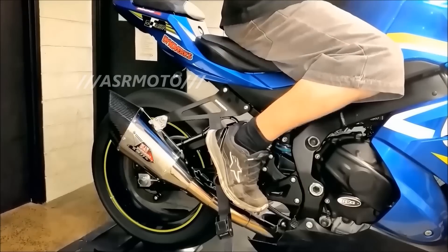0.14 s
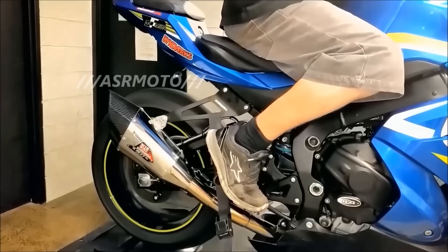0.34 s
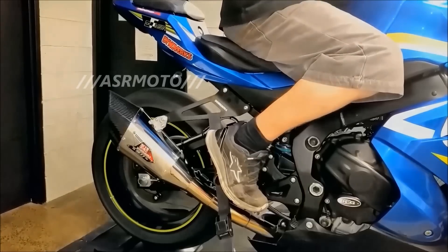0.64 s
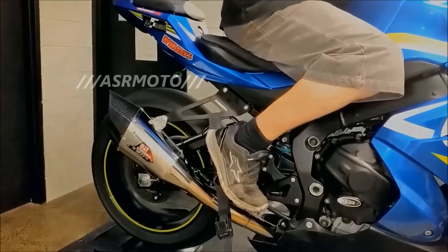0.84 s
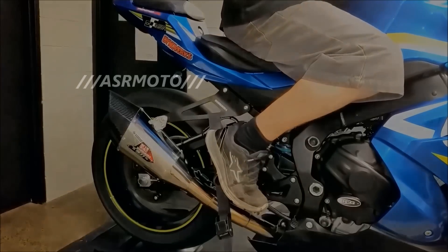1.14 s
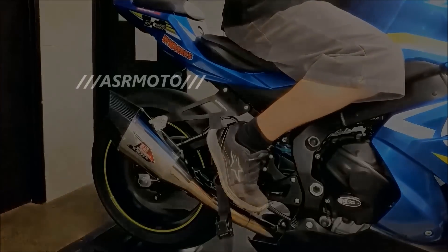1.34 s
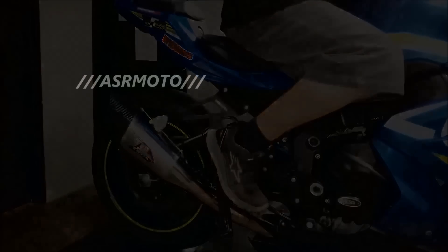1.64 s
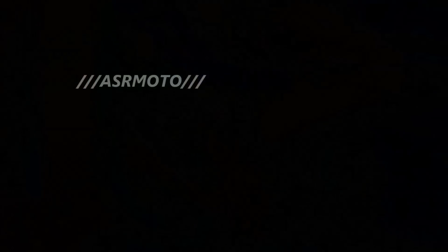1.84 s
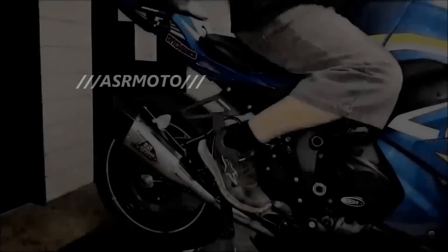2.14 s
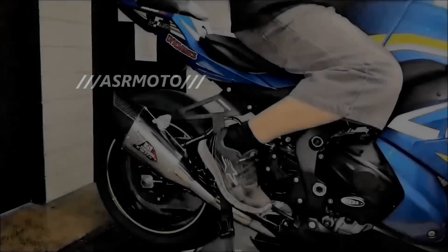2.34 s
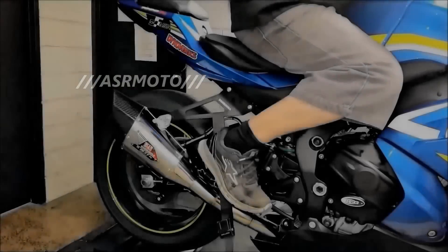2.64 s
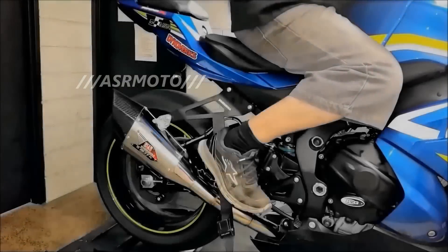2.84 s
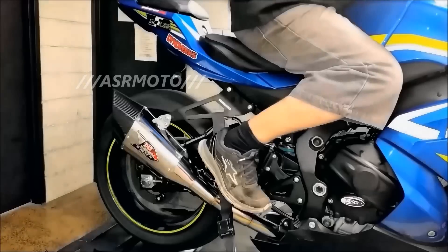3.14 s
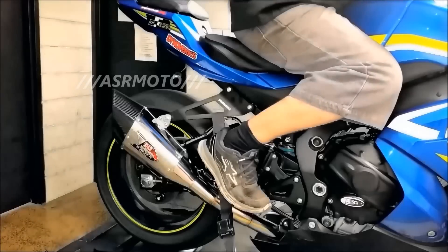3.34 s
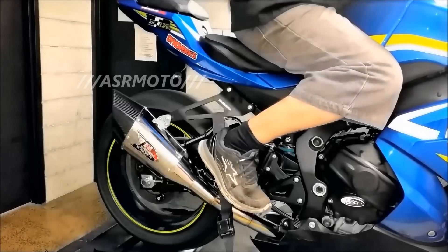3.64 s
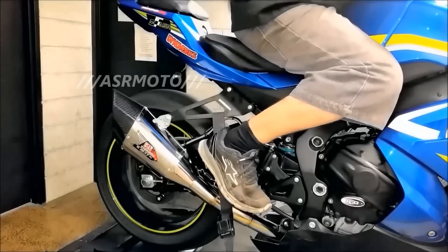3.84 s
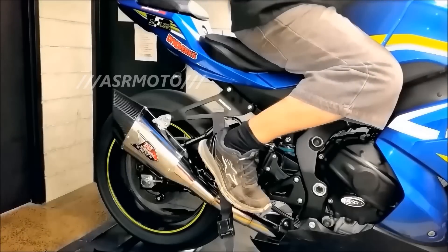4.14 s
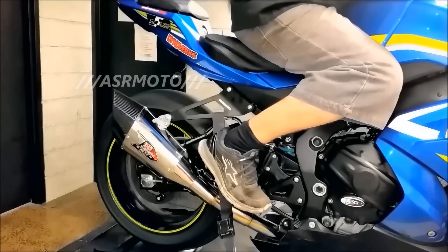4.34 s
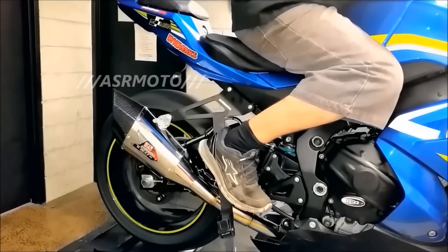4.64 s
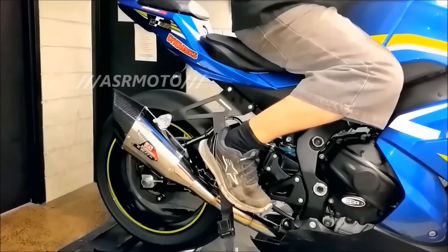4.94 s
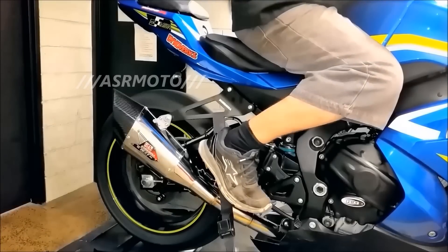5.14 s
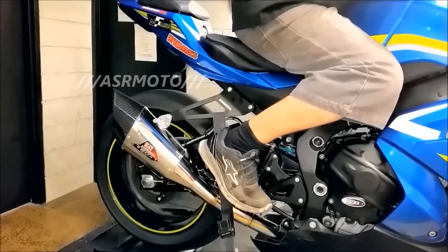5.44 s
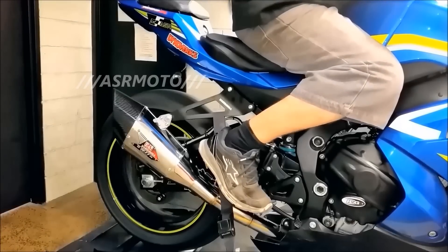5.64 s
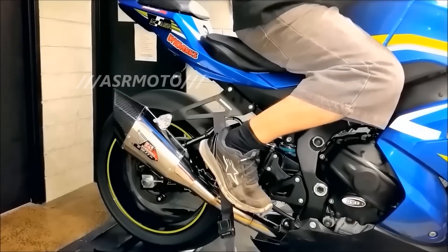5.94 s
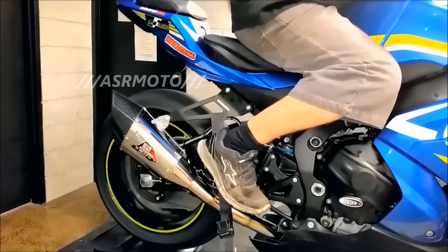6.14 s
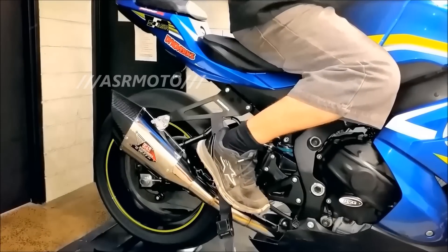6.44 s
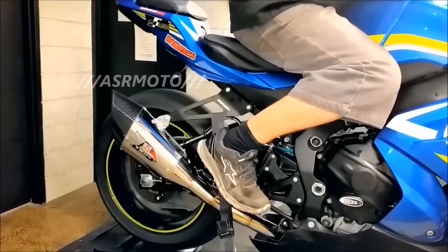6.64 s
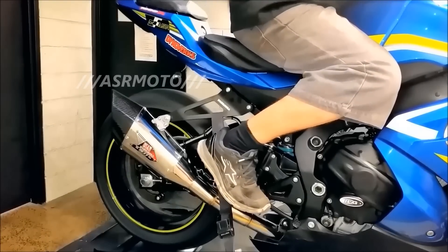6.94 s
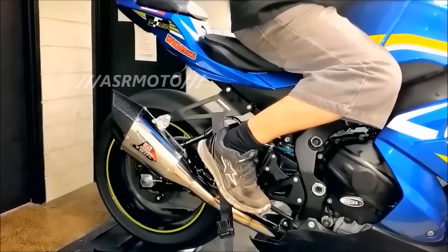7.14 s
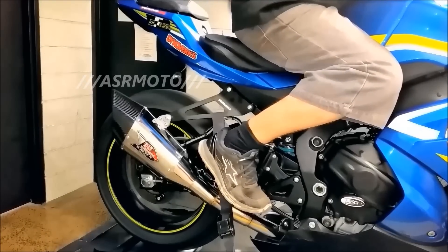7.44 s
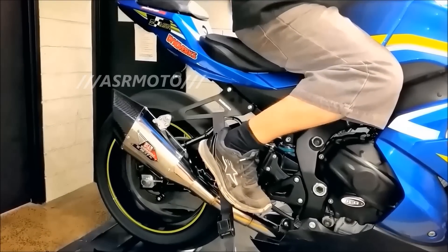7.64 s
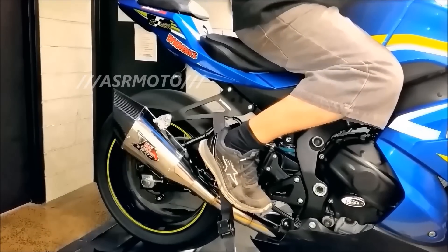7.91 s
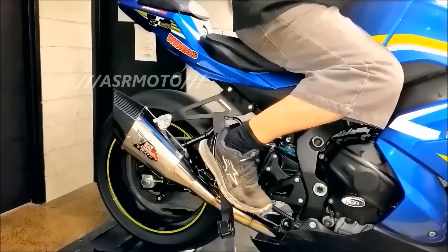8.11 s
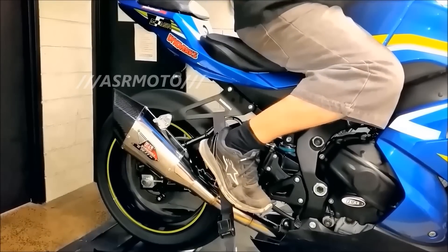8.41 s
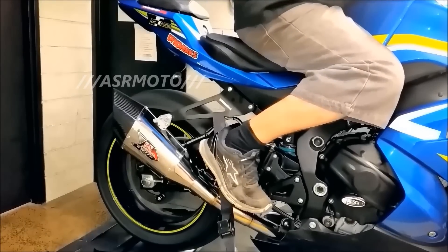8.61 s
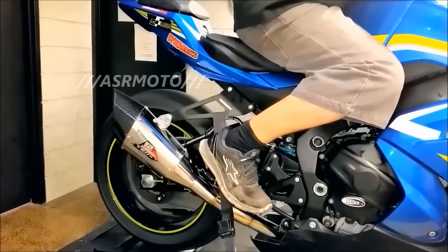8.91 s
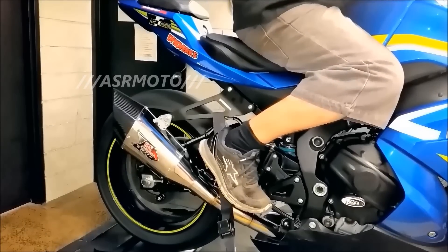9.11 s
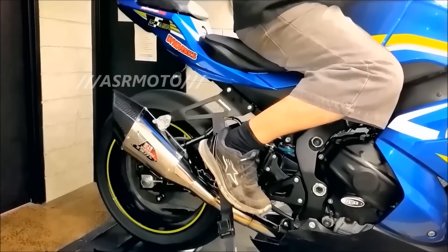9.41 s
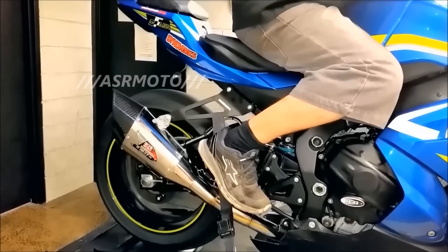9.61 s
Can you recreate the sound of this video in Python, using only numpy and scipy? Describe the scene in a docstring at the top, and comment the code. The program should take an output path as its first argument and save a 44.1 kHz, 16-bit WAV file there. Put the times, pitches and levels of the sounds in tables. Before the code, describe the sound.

A four-cylinder engine heard beside its exhaust in a boomy, reflective room. A short blip and softer coast fade out near two seconds; a deep, pulsing idle fades in and swells into a steady roar. The tone climbs smoothly, stumbles through a rough gear change with a throttle blip, climbs again, then snaps down at a quick shift. Throbbing mechanical clatter, fan drone and hiss sit underneath; the close stereo microphone compresses loud booms.

```python
"""A four-cylinder motorcycle on a roller test bench, close to a two-port microphone in a small hard-walled workshop.
It blips and coasts, fades out and in, then pulls through two gear shifts. The exhaust is a comb of firing tones
over a rumble of uneven firings, and sweeps through the standing waves of the room. Clatter is noise that throbs
with the firings, and gear whine is wavering tones. Shaped noise makes the cooling fan's drone, and a low thud
with airy hiss. Automatic gain ducks the hiss under each boom."""
import sys
import numpy as np
from scipy import signal
from scipy.fft import rfft, irfft, next_fast_len
from scipy.io import wavfile
from scipy.ndimage import uniform_filter1d, map_coordinates

SR = 44100
rng = np.random.default_rng(int(sys.argv[2]) if len(sys.argv) > 2 else 0)


def output_pcm(signal):
    """Save a mono or channel-first signal as 16-bit PCM at the path in sys.argv[1].

    Samples are clipped to [-1, 1] before scaling.
    """
    pcm = np.clip(np.atleast_2d(signal).T, -1, 1) * 32767
    wavfile.write(sys.argv[1], SR, np.round(pcm).astype(np.int16))


N = 430857

# All levels are relative: later stages and the automatic gain shift them.
# Engine speed through blip, hold, coast, idle, first pull, clutch and blip, second pull, quick shift:
# start_s [s], firing_rate_hz [firings per second]
ENGINE_SPEED = [(0, 103.7), (.3, 92.8), (.5, 98.55), (.74, 119.7), (.84, 143.2), (1.44, 139.2),
                (1.51, 131.5), (1.68, 92), (1.95, 75), (1.97, 54.6), (2.3, 54.3), (2.55, 57.5),
                (2.98, 53.9), (4.0, 82.3), (4.62, 102), (4.8, 110.2), (6.25, 165), (6.29, 170.2),
                (6.4, 144.1), (6.58, 120.3), (6.77, 135.3), (6.89, 128.2), (7.3, 132.1), (7.6, 137.9),
                (8.3, 156.9), (9.0, 177.5), (9.475, 189.8), (9.54, 157.1), (9.77, 163.4)]
# Throttle: start_s [s], even_firing_db [dB], pulse_softness_db [dB per order], uneven_firing_db [dB]
THROTTLE = [(0, -44, 7, -46.5), (.12, -50, 7, -47), (.6, -56, 7, -52.5), (.8, -54, 2.5, -54.5),
            (.84, -48, 8.5, -70), (1.1, -50.5, 13, -63), (1.5, -50, 6, -59), (1.95, -53, 2.5, -47),
            (2, -56.5, -0.5, -82), (2.5, -54.5, 0, -67.5), (2.85, -57, -1.5, -71), (3.4, -46.5, 1.5, -55.5),
            (4, -42.5, 1, -53), (4.9, -37, 1, -49), (6.2, -38.5, 0.5, -49.5), (6.4, -46, 8, -41),
            (6.55, -44.5, 2.5, -46), (6.88, -39.5, 1, -46.5), (7.4, -37, 1, -50.5), (8, -37.5, 0, -47),
            (9.3, -37, 2.5, -56), (9.6, -40, 1.5, -40), (9.77, -36.5, 1.5, -52)]
# Ragged firing around the shifts: centre_s [s], half_length_s [s, to 1/e], even_firing_loss_db [dB]
SHIFT_CUTS = [(6.235, 0.015, 6), (6.708, 0.085, 5), (9.511, 0.03, 13)]
CUT_SHARPENS, CUT_BANGS = 0.46, 0.66  # softness lost and unevenness gained per dB of loss
# Exhaust tones, the half orders from unlike cylinders: order [multiple of the firing rate], level_db [dB]
EXHAUST_ORDERS = [(.5, -25), (1, 2), (1.5, -10), (2, 0), (2.5, -13), (3, -2.5), (3.5, -14), (4, -6.5),
                  (4.5, -16), (5, -10.5), (5.5, -37), (6, -15.5), (6.5, -29.5), (7, -25), (8, -32)]
# Exhaust pipe colour: pitch_hz [Hz], level_db [dB]
PIPE_COLOUR = [(30, -3.5), (60, 23), (100, 24.5), (150, 21.5), (250, 17.5), (400, 20), (640, 19.5),
               (1000, 6), (2000, -8)]
# Resonances of room and silencer, peaks and nulls: pitch_hz [Hz], width_hz [Hz], level_db [dB]
ROOM_AND_SILENCER = [(57.9, 2.2, 5), (653, 13, 8), (694, 31, 6.5), (745, 34, 5.5), (807, 12.6, 9),
                     (835, 43, -20), (891, 28, 5), (938, 33, 3.5), (1005, 8.8, 10.5), (1056, 11.4, 10.5),
                     (1172, 16, 8.5), (1321, 15, 7), (1655, 11, 8)]
# Standing waves, peaks and nulls at the microphone: pitch_hz [Hz], width_hz [Hz], level_db [dB]
ROOM_MODES = [(69.6, 11.7, -32), (89.4, 5.5, -4.5), (99.2, 5.4, 3), (125.34, 8.4, -30), (140.3, 3.96, 7.5),
              (155.1, 14, 12), (156.75, 9.6, -14), (168.2, 6.1, -43), (180, 11.2, 15), (187.6, 44, -39),
              (202.7, 5.3, 8), (222.3, 11.5, 11.5), (227.5, 8.7, -19), (265, 2.4, -28.5), (307, 2.3, -2),
              (307.4, 3.2, 11.5), (314.4, 15.6, -16), (331.3, 4.9, 13.5), (343.3, 45.4, -34.5),
              (351, 8, 16), (387.6, 6.2, -12), (401.6, 11.7, 16), (404.8, 13.2, -32), (434.2, 13.5, 7.5),
              (492.3, 8.6, 17), (501.4, 39.6, -10), (544.7, 10.4, 13), (553.7, 28, -12.5), (580, 5.7, -9),
              (626.5, 60, -37)]
# Valve gear, chain and air: pitch_hz [Hz], level_db [dB per Hz]
CLATTER_COLOUR = [(350, -4), (600, -4), (688, -16.5), (844, -6), (1010, -11.5), (1480, -11), (1630, -11.5),
                  (1890, -12), (2140, -13), (7210, -25.5), (10100, -21.5), (11900, -19), (15700, -25.5)]
CLATTER_EVEN_DB, CLATTER_UNEVEN_DB = -4.5, 1  # clatter re even and re uneven firing
CLATTER_OCTAVE_DB, CLATTER_IDLE_DB = 5.5, -57  # rise per octave of speed; least level
# Gear tooth whine: order [multiple of the firing rate], level_db [dB]
GEAR_TEETH = [(22.5, -24), (23.05, -6.5), (24.05, -20)]
# Gear casing resonances: pitch_hz [Hz], width_hz [Hz], level_db [dB]
GEAR_CASING = [(4230, 340, 14), (3670, 150, -3), (2930, 210, 4), (2100, 200, 5.5)]
# Cooling fan drone: pitch_hz [Hz], half_width_hz [Hz, to half amplitude], level_db [dB]
FAN_DRONE = [(294, 15, -35)]
# Low thud and hiss of air: pitch_hz [Hz], level_db [dB per Hz]
THUD_AND_HISS = [(25, 12), (45, 7), (58, 35.5), (75, 19), (300, -19), (1000, -14), (3000, -1.5), (5500, 3),
                 (7500, -7), (10000, 5.5), (15700, -7)]
# Level of the low thud and hiss: start_s [s], level_db [dB]
THUD_AND_HISS_LEVEL = [(0, -34.5), (.8, -37.5), (.86, -47), (5.9, -55), (6.4, -36), (7.1, -35), (7.6, -49),
                       (9.77, -53)]
# Likeness of the ports for equal mid and side: pitch_hz [Hz], likeness [correlation, -1 to 1]
PORT_LIKENESS = [(60, 0.78), (130, 0.77), (290, 0.57), (640, 0.34), (1400, 0.062), (3000, -0.12),
                 (7000, -0.18), (15000, -0.076)]
# Lean of the microphone ports: pitch_hz [Hz], left_minus_right_db [dB]
PORT_LEAN = [(60, 3.0), (110, 2.5), (200, 3.5), (380, 2.5), (700, 2.5), (1290, 2.5), (2380, 1.0),
             (4400, -2.0), (8120, 1.5), (15000, 2.0)]
# Fade out and in: start_s [s], gain [factor]
FADE_GAIN = [(0, 1), (.9, 1), (1.925, 0), (2.012, 0), (3, 1), (9.77, 1)]
TOP_HZ = 15780  # upper limit of the microphone channel


def exhaust():
    """Even firings give a comb of tones; the scatter from firing to firing gives a rumble between them."""
    hz, count = firings()
    _, even_db, soft_db, uneven_db = throttle()
    # ragged firing makes the tones waver
    shaky = np.clip(amp(.5 * (uneven_db - even_db + 12.5)), .2, 2.5)
    tones = 0
    for order, level_db in EXHAUST_ORDERS:
        odd = order % 1
        # soft pulses lose overtones and sound alike
        dulled_db = soft_db * (abs(order - 1) + 5 * odd)
        # cylinders differ more at speed
        dulled_db = dulled_db - 12 * odd * (order > 1) * np.log2(hz / 110)
        strength = amp(level_db - dulled_db + 1.87 * shaky * wobble(14))
        cycles = order * count + 2 * odd * rng.random()
        jitter = 0.11 * order * shaky * wobble(20)  # radians
        tones += strength * np.sin(2 * np.pi * cycles + jitter)

    fired = np.diff(np.floor(count), prepend=0)
    scatter = fired * rng.standard_normal(N) * np.sqrt(SR / hz)
    # turbulence puffs with each firing
    gas = 0.037 * rng.standard_normal(N) * (1 + np.cos(2 * np.pi * count))
    rumble = filtered(0.17 * scatter + 2.98 * gas, lambda f: 1 / (1 + 1j * f / 320) ** 2)
    # slow running thuds deeper
    rumble += (110 / hz - 1) * filtered(rumble, lambda f: 1 / (1 + (f / 90) ** 4))

    flow = np.sqrt(2) * amp(even_db) * tones + amp(uneven_db + 33.5) * rumble
    return filtered(flow, lambda f: amp(along(PIPE_COLOUR, f)) * resonances(ROOM_AND_SILENCER, f))


def firings():
    """Firing rate, and its running sum as the count of firings."""
    hz = curves(ENGINE_SPEED)[0]
    return hz, np.cumsum(hz) / SR


def throttle():
    """Levels of clatter, even firing, softness and uneven firing; clatter sums what both firings shake loose."""
    even_db, soft_db, uneven_db = curves(THROTTLE)
    t = np.arange(N) / SR
    cut_db = sum(loss_db * np.exp(-((t - s) / half) ** 2) for s, half, loss_db in SHIFT_CUTS)
    # clatter follows the even firing as it is before the cuts
    shaken_db = even_db + CLATTER_EVEN_DB + CLATTER_OCTAVE_DB * np.log2(firings()[0] / 110)
    even_db = even_db - cut_db
    soft_db = soft_db - CUT_SHARPENS * cut_db
    uneven_db = uneven_db + CUT_BANGS * cut_db
    power = amp(2 * shaken_db) + amp(2 * (uneven_db + CLATTER_UNEVEN_DB)) + amp(2 * CLATTER_IDLE_DB)
    return 10 * np.log10(power), even_db, soft_db, uneven_db


def machinery():
    """Clatter throbs with the firings and rings room and silencer; gear teeth whine faintly under load."""
    hz, count = firings()
    clatter_db, even_db, soft_db, _ = throttle()
    unsteady_db = 0.84 * wobble(3.2) + 0.78 * wobble(10) + 0.32 * wobble(18)
    throb = amp(0.45 * np.cos(2 * np.pi * count) + unsteady_db)
    colour = lambda f: amp(along(CLATTER_COLOUR, f)) * resonances(ROOM_AND_SILENCER, f)
    clatter = filtered(throb * rng.standard_normal((2, N)), colour)
    clatter /= np.std(filtered(clatter, lambda f: f > 9000))  # the treble sets the level

    teeth = 0
    for order, level_db in GEAR_TEETH:
        strength = amp(level_db + 3.5 * wobble(50) + 2.96 * wobble(4))
        teeth += strength * np.sin(2 * np.pi * order * count + 2.2 * wobble(120))
    # quick speed changes unload the teeth
    slip = uniform_filter1d(np.abs(np.gradient(hz)) * SR, SR // 20)  # Hz per second
    load = amp(even_db - clatter_db - 6.5 - 2.0 * soft_db) / (1 + (slip / 70) ** 4)
    whine = filtered(load * teeth, lambda f: resonances(GEAR_CASING, f))
    return amp(clatter_db + 4.5) * (widened(*clatter) + whine)


def room(pipe):
    """Standing waves colour the exhaust; dense wall echoes join in higher up."""
    tails = echoes(channels=2, t60=0.98)
    wet = signal.fftconvolve(pipe[None], tails, axes=1)[:, :N]
    # share of dense echoes, where standing waves crowd
    high = lambda hz: 1 / (1 + (700 / (hz + 1)) ** 6)
    mid = filtered(pipe, lambda hz: resonances(ROOM_MODES, hz))
    mid = mid + filtered(wet[0], lambda hz: 0.87 * high(hz))
    # long waves reach both ports alike
    apart = lambda hz: .45 + .5 / (1 + (230 / (hz + 1)) ** 4)
    side = filtered(wet[1], lambda hz: apart(hz) * abs(resonances(ROOM_MODES, hz)) ** .7)
    return widened(0.87 * mid, side)


def echoes(channels, t60):
    """Dense wall echoes: noise decaying 60 dB in t60 seconds, each channel of energy 1."""
    t = np.arange(SR // 2) / SR
    tail = rng.standard_normal((channels, len(t))) * amp(-60 * t / t60)
    return tail / np.linalg.norm(tail, axis=1, keepdims=True)


def fan():
    """Narrow bands of noise make the cooling fan's drone."""
    drone = 0
    for centre, width, level_db in FAN_DRONE:
        band = filtered(rng.standard_normal((2, N)), lambda f: 1 / (1 + ((f - centre) / width) ** 2))
        drone += amp(level_db) * unit(band)
    return widened(*drone)


def thud_and_hiss():
    """Noise shaped into a low thud and an airy hiss, rising and falling together."""
    noise = rng.standard_normal((2, N))
    shaped = unit(filtered(noise, lambda f: amp(along(THUD_AND_HISS, f))))
    return widened(*(amp(curves(THUD_AND_HISS_LEVEL)[0]) * shaped))


def widened(mid, side):
    """Mix independent signals; at equal strength, left and right agree as PORT_LIKENESS says."""
    turn = lambda hz: np.arccos(np.clip(along(PORT_LIKENESS, hz), -1, 1)) / 2
    shares = lambda hz: np.array([np.cos(turn(hz)), np.sin(turn(hz))])
    mid, side = filtered(np.array([mid, side]), shares)
    return np.array([mid + side, mid - side])


def resonances(table, hz):
    """Each peak or null lifts or cancels its own band."""
    gain = np.ones(len(hz), complex)
    for centre, width, level_db in table:
        stiffness = centre ** 2 - hz ** 2
        damping = 1j * hz * width
        gain *= (stiffness + damping * amp(level_db)) / (stiffness + damping)
    return gain


def amp(db):
    """Decibels to an amplitude factor."""
    return 10 ** (np.asarray(db) / 20)


def unit(x):
    """Scale to an RMS of 1."""
    return x / np.sqrt(np.mean(x ** 2) + 1e-20)


def along(points, hz):
    """Interpolate (pitch_hz, value) points on a log frequency axis."""
    f, v = np.transpose(points)
    return np.interp(np.log(hz + 1), np.log(f + 1), v)


def curves(rows):
    """One value per sample for each column after the time."""
    s, *cols = np.transpose(rows)
    return [np.interp(np.arange(N) / SR, s, c) for c in cols]


def wobble(rate):
    """A smooth random curve, rate knots a second."""
    knots = rng.standard_normal(int(N * rate / SR) + 4)
    return map_coordinates(knots, [np.arange(N) * rate / SR])


def filtered(x, response):
    """Filter x by a complex response of frequency."""
    m = next_fast_len(N + SR)  # a second of padding
    return irfft(rfft(x, m) * response(np.fft.rfftfreq(m, 1 / SR)), m)[..., :N]


def scene():
    """The exhaust sounds through the room's echoes; machinery, fan, thud and hiss have no echo tail."""
    return room(exhaust()) + machinery() + fan() + thud_and_hiss()


def record(dry):
    """Microphone ports lean left or right by pitch; gain falls as level rises, peaks round off, then the fade."""
    x = filtered(dry, lambda hz: amp(np.outer([.5, -.5], along(PORT_LEAN, hz))))
    power = uniform_filter1d(np.mean(x ** 2, axis=0), int(0.062 * SR))
    level_db = 10 * np.log10(np.abs(power) + 1e-9)
    x = x * amp(-.4 * (level_db + 14.0))
    x = x / (1 + np.abs(x / .95) ** 6) ** (1 / 6)  # rounds peaks off below .95
    faded = x * np.clip(curves(FADE_GAIN)[0], 0, 1)
    return filtered(faded, lambda hz: hz < TOP_HZ)


dry = scene()
out = record(dry)
output_pcm(out)
```